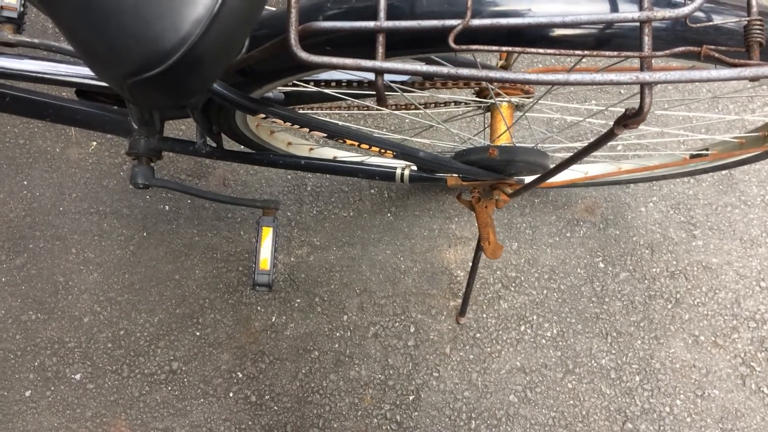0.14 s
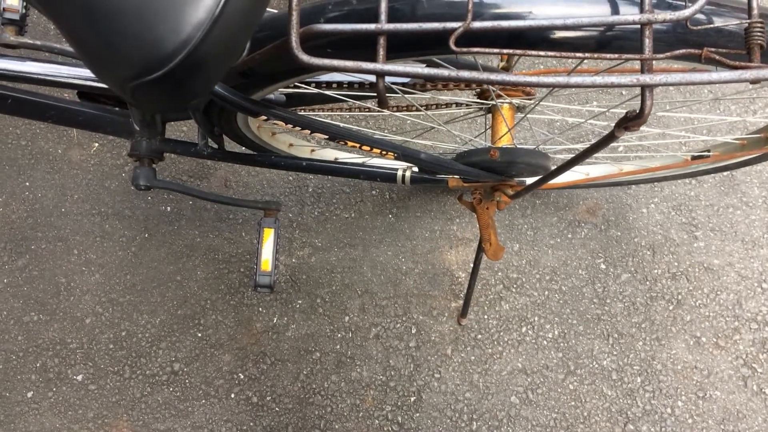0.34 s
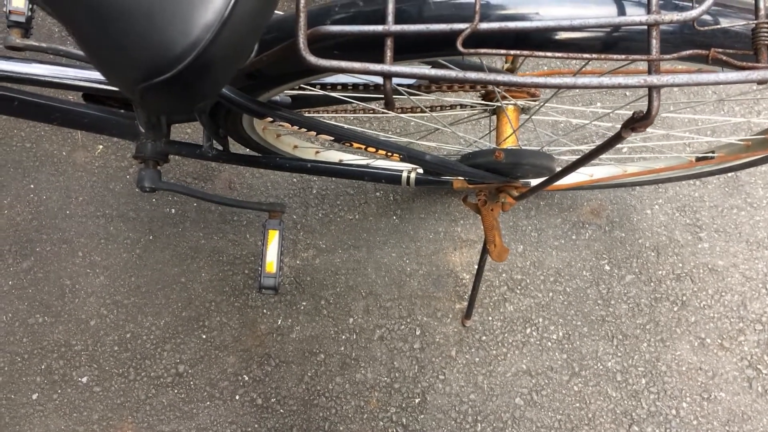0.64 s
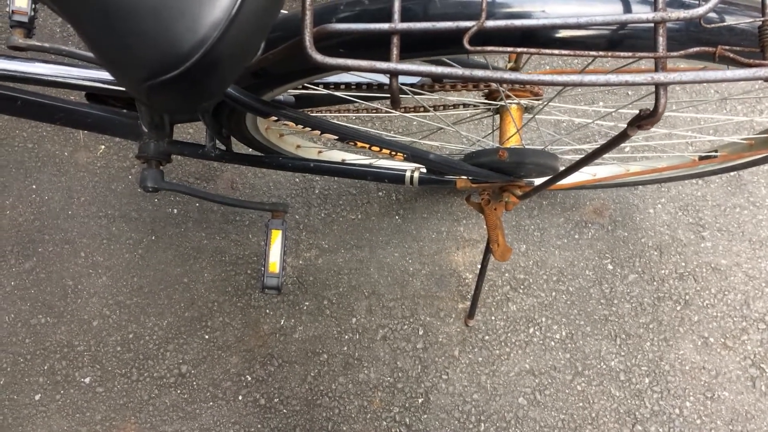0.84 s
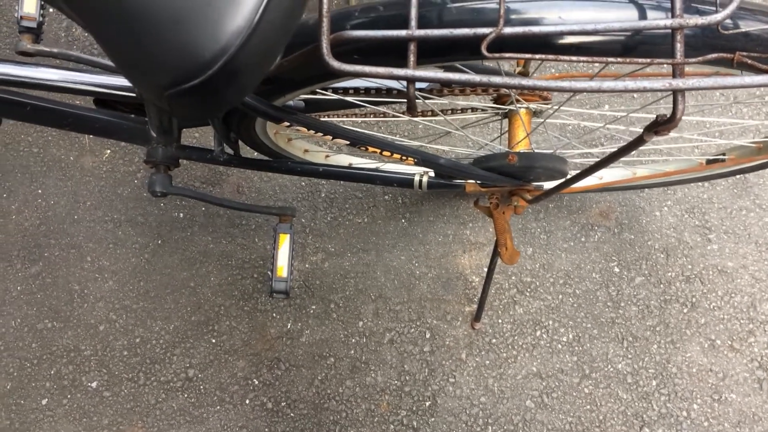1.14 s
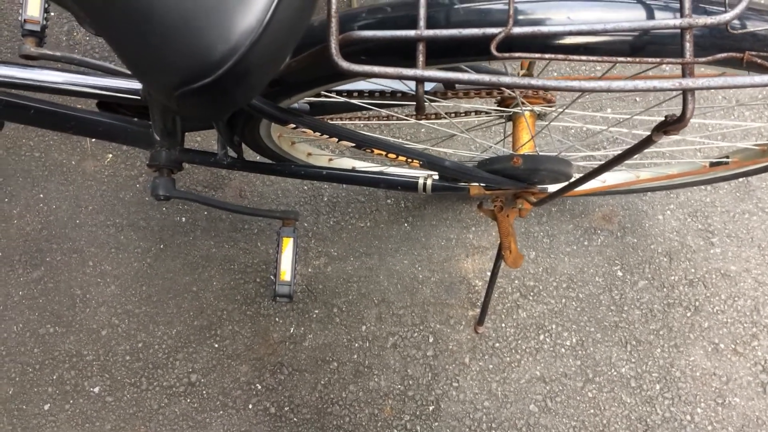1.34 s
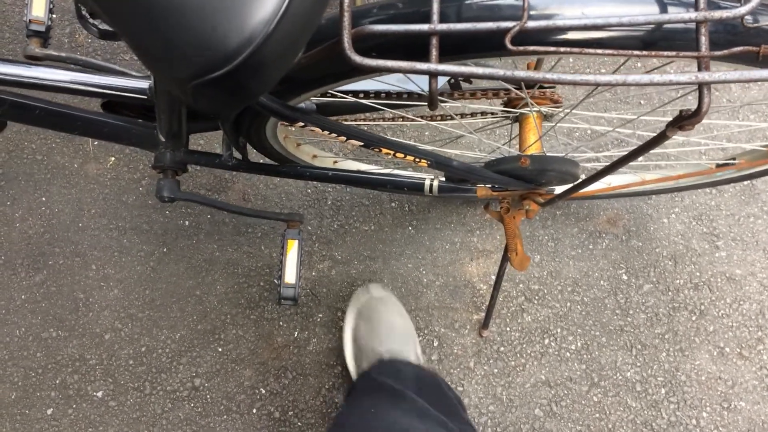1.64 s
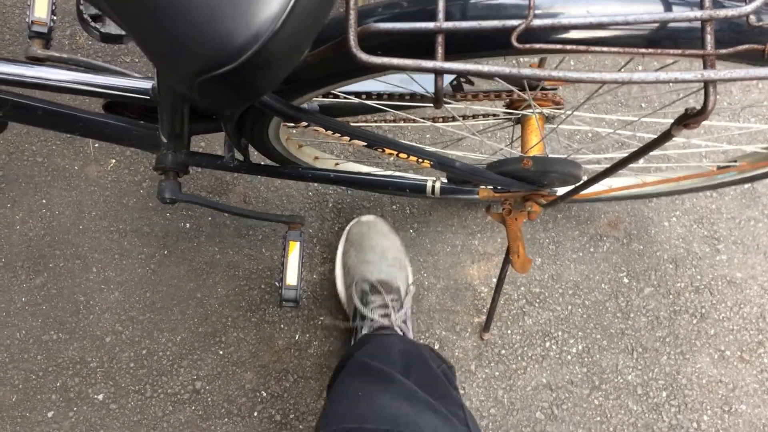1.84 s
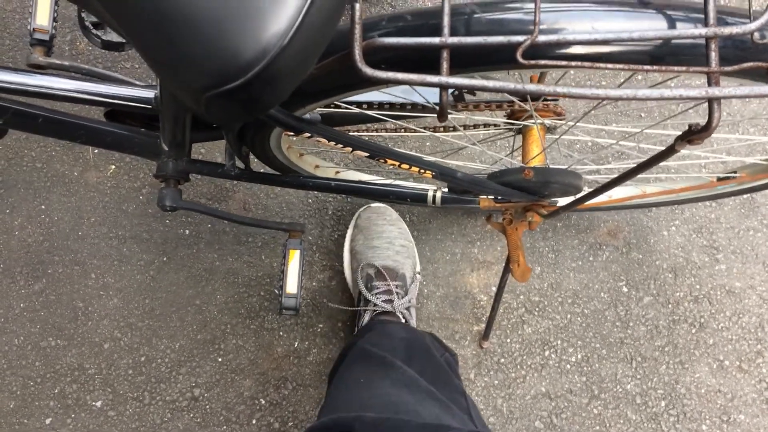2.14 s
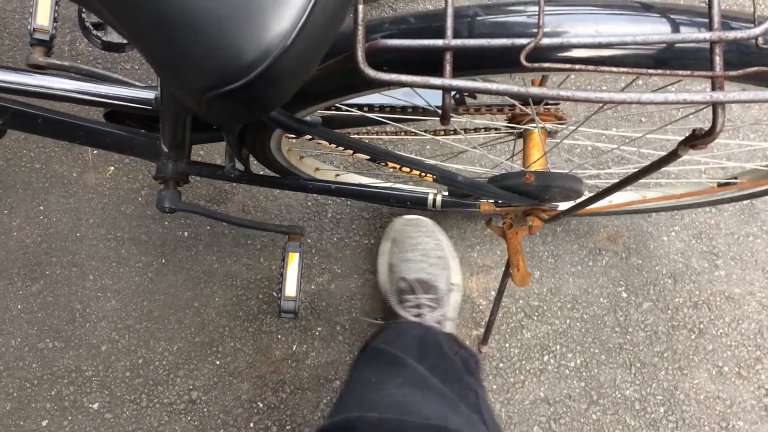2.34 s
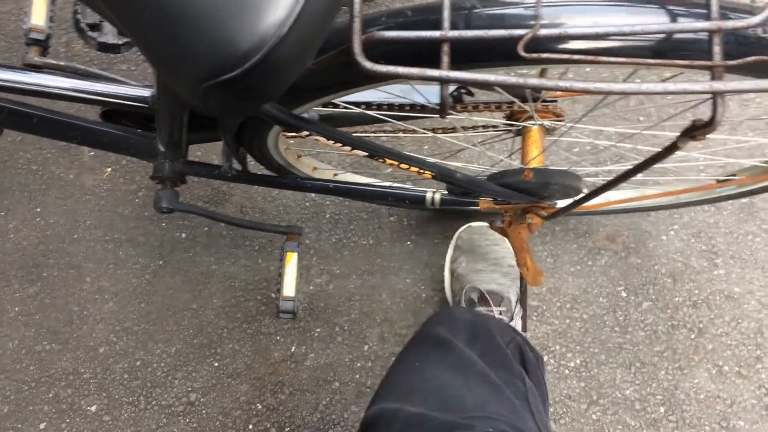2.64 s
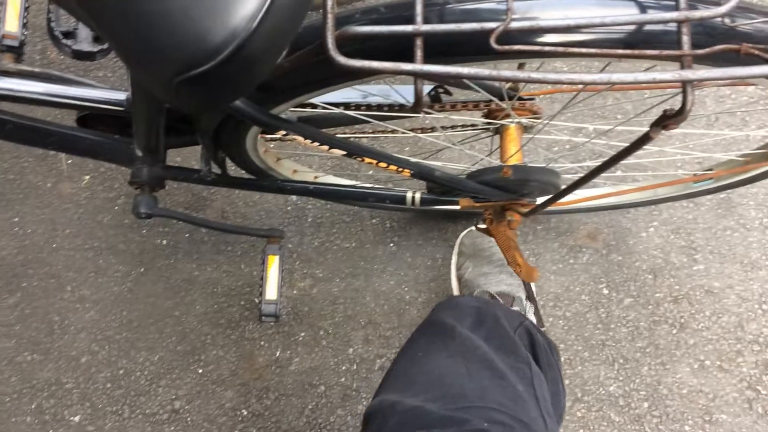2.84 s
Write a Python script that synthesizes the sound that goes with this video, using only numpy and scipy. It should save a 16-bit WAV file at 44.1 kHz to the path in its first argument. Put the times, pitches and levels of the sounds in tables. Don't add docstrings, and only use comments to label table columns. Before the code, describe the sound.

Small engine idles close by and draws away, then a shoe knocks a steel bicycle kickstand

```python
import sys
import numpy as np
from scipy import signal
from scipy.fft import rfft, irfft, next_fast_len
from scipy.io import wavfile
from scipy.ndimage import uniform_filter1d, map_coordinates

SR = 44100
rng = np.random.default_rng(int(sys.argv[2]) if len(sys.argv) > 2 else 0)


def dump(signal):
    limited = np.clip(np.atleast_2d(signal).T, -1, 1)
    pcm = np.round(limited * 32767).astype(np.int16)
    wavfile.write(sys.argv[1], SR, pcm)


def ratio(d):
    e = np.asarray(d, float) / 20
    return 10 ** e


N = 132741
TIME = np.arange(N) / SR


def unit(x):
    return x / np.sqrt(np.mean(x ** 2) + 1e-20)


def along(points, hz):
    f, v = np.transpose(points)
    return np.interp(np.log(hz + 1), np.log(f + 1), v)


def wobble(rate):
    knots = rng.standard_normal(int(N * 80 / SR) + 4)
    return map_coordinates(knots, [TIME * min(rate, 80)])


def filtered(x, response):
    m = next_fast_len(len(x) + 8192)
    return irfft(rfft(x, m) * response(np.fft.rfftfreq(m, 1 / SR)), m)[:len(x)]


def rush(spectrum, patchy_db):
    z = signal.stft(rng.standard_normal(N), nperseg=512)[2]
    field = uniform_filter1d(rng.standard_normal(z.shape), size=6, axis=0)
    field = uniform_filter1d(field, size=12, axis=1)
    x = signal.istft(z * ratio(patchy_db * unit(field)), nperseg=512)[1][:N]
    return unit(filtered(x, lambda hz: ratio(along(spectrum, hz))))


def struck(t, db, t60, rise_s):
    return ratio(db - 60 * t / t60) * (1 - np.exp(-t / rise_s))


def add_at(out, s, sound):
    out[round(s * SR):][:len(sound)] += sound


# (frequency [Hz], density [dB per Hz])
TRAFFIC_SPECTRUM = [(12, -41), (20, -16), (86, -7), (114, -6.5), (140, -8), (243, -11), (404, -11),
                    (560, -21), (700, -23.5), (910, -29), (1540, -120)]
# (frequency [Hz], density [dB per Hz])
HISS_SPECTRUM = [(290, -52), (500, -7.5), (860, -5), (1400, -7), (2060, -5.5), (2600, -12.5), (4500, -23),
                 (5850, -71), (9900, -120)]
# (frequency [Hz], density [dB per Hz])
AIR_SPECTRUM = [(2500, -5.5), (4200, -14), (5000, 0), (7000, -6), (10000, -10), (13500, -14), (15000, -17),
                (15700, -24)]


def street(near_db):
    rumble_db = -46.5 + 0.26 * near_db + 1.0 * wobble(4.5)
    hiss_db = -51 + 0.41 * near_db + 0.47 * wobble(5.9)
    air_db = -67.5 + 0.45 * near_db + 0.27 * wobble(3.65)
    rumble = ratio(rumble_db) * rush(TRAFFIC_SPECTRUM, patchy_db=1.5)
    hiss = ratio(hiss_db) * rush(HISS_SPECTRUM, patchy_db=1.0)
    return rumble + hiss + ratio(air_db) * rush(AIR_SPECTRUM, patchy_db=1.0)


# (time [s], low edge [Hz], high edge [Hz], level [dB])
FLECKS = [
    (.522, 8200, 10600, -74),
    (.638, 6200, 8500, -72),
    (1.172, 9600, 11200, -82),
    (1.242, 7500, 9100, -79),
    (1.381, 4100, 5800, -72),
    (1.73, 4150, 5170, -71),
    (2.288, 4600, 6370, -73),
    (2.287, 10190, 11770, -81),
    (2.31, 6900, 8480, -77),
    (2.984, 5123, 6400, -73),
]


def flecks():
    half_s = 0.01
    out = np.zeros(N)
    for s, low, high, db in FLECKS:
        band = unit(filtered(rng.standard_normal(N), lambda f: (f > low) & (f < high)))
        out += ratio(db) * np.exp(-((TIME - s) / half_s) ** 4) * band
    return out


# (time [s], level [dB], decay t60 [s])
TAPS = [
    (1.02, -56, .035),
    (1.028, -61, .03),
    (2.556, -60, .012),
    (2.5585, -47.5, .02),
    (2.565, -52, 0.033),
    (2.575, -62, .08),
    (2.729, -66, .036),
    (2.745, -64, 0.048),
]
# (frequency [Hz], level [dB])
TAP_SPECTRUM = [(900, -28), (2000, 16), (4600, 0), (6200, 1), (7200, 3), (8300, 3), (12800, -2.5),
                (15500, -6)]
# (start [s], end [s], level [dB])
SCUFFS = [
    (1.555, 1.981, -74.5),
    (2.7, 2.801, -75),
]
# (frequency [Hz], density [dB per Hz])
SCUFF_SPECTRUM = [(4000, -28), (7000, 5), (10000, 1), (13000, -8.5), (15000, -22)]


def shoe():
    push, t = np.zeros(N + SR), TIME[:4000]
    for s, db, t60 in TAPS:
        add_at(push, s, struck(t, db, t60, 0.00047) * rng.standard_normal(len(t)))
    taps = filtered(push[:N], lambda hz: ratio(along(TAP_SPECTRUM, hz)))
    stroke = np.zeros(N)
    for start, end, db in SCUFFS:
        ramp = np.minimum(TIME - start, end - TIME) / 0.028
        stroke += ratio(db) * np.clip(ramp, 0, 1)
    return taps + stroke * rush(SCUFF_SPECTRUM, patchy_db=-3.5)


# (frequency [Hz], level [dB], decay t60 [s])
ROD_MODES = [(1500, -52, .06), (2100, -52, .06), (3200, -58, .03), (3800, -59, .04), (5206, -65, .07),
             (6250, -62, .06), (8210, -66, .04), (9485, -69, .04), (12700, -68, .06), (13900, -72, .05)]
# (time [s], level [dB], extra level of the low modes [dB])
ROD_HITS = [
    (1.021, 2, -12),
    (2.556, -12, 13),
    (2.559, 1, -3),
    (2.566, -6, 4),
    (2.573, -8, 2),
]


def kickstand():
    out, t = np.zeros(N + SR), TIME[:5000]
    for s, db, low_db in ROD_HITS:
        for hz, mode_db, t60 in ROD_MODES:
            level_db = db + mode_db + low_db * (hz < 4000) + rng.normal(0, 1.5)
            add_at(out, s, struck(t, level_db, t60, 0.00092) * np.sin(2 * np.pi * hz * t))
    return out[:N]


# (time [s], length [s], level [dB])
SQUEAKS = [
    (.655, .026, -62),
    (.685, .045, -70),
    (.75, .03, -76),
    (.95, .04, -72),
    (1.46, .04, -77),
    (1.53, .03, -68),
]


def brake():
    squeak_hz, blur_rad, octave_db = 5700, 1.3, -9
    grip = sum(ratio(db) * np.exp(-((TIME - s - d / 2) / (0.41 * d)) ** 2) for s, d, db in SQUEAKS)
    phase = 2 * np.pi * squeak_hz * TIME + blur_rad * wobble(70)
    flutter = ratio(4.0 * wobble(75.0))
    octave = ratio(octave_db) * np.sqrt(grip / grip.max()) * np.sin(2 * phase)
    return grip * flutter * np.sqrt(2) * (np.sin(phase) + octave)


# (time [s], peak level [dB], frequency [Hz])
VALVE_TICKS = [(.004, -38, 3800), (.0472, -38, 4070), (.0688, -46, 3820), (.0908, -39, 3900),
               (.122, -40, 3970), (.149, -47, 3920), (.1657, -39, 3990), (.195, -43, 3780),
               (.2106, -39, 4000), (.2548, -38, 3900), (.2696, -46, 3740), (.29, -47, 3900),
               (.3, -43, 3700), (.3346, -49, 3520), (.345, -55, 3600), (.3731, -40, 3720),
               (.4035, -43, 3680), (.4319, -39, 3780), (.4614, -53, 3800), (.5656, -47, 3970),
               (.615, -48, 3680), (.659, -51, 3010), (.7123, -38, 3120), (.7572, -44, 3240),
               (.9068, -48, 3560), (.9512, -45, 3460)]


def valves(near_db):
    t60, upper_ratio, upper_db, snap_db = .0075, 1.13, -6, -11
    top_db, gain_db = -40, 4
    rattle_db, rattle_follows = -75.5, 1.68

    def bright(f):
        return (f / 3500) ** 4 / (1 + (f / 3500) ** 4) / (1 + (f / 8300) ** 10)

    def rattle_colour(f):
        return bright(f) * (1 + 1.7 / (1 + ((f - 3900) / 450) ** 2))

    ticks, t = np.zeros(N + SR), TIME[:1500]
    for s, db, hz in VALVE_TICKS:
        snap = ratio(snap_db) * unit(filtered(rng.standard_normal(len(t)), bright))
        upper = ratio(upper_db) * np.sin(2 * np.pi * hz * upper_ratio * t)
        modes = np.sin(2 * np.pi * hz * t) + upper
        add_at(ticks, s, struck(t, min(db, top_db) + gain_db, t60, .0005) * (modes + snap))
    clumps_db = 2.6 * unit(uniform_filter1d(rng.standard_normal(N), size=60))
    grains = rng.standard_normal(N) * ratio(clumps_db)
    rattle = ratio(rattle_db + rattle_follows * near_db) * unit(filtered(grains, rattle_colour))
    return ticks[:N] + rattle


# (time [s], firing rate [Hz], exhaust drone [dB], upper partner [dB], casing ring [dB])
ENGINE = [(0.0, 33.7, -41, -42, -61), (0.04, 33.93, -39.5, -47, -49.5), (0.43, 34.03, -39.5, -42.5, -51),
          (1.0, 33.47, -40, -48, -59.5), (1.15, 33.47, -38.5, -44.5, -62.5), (1.4, 33.81, -42.5, -57, -55),
          (1.42, 32.75, -42, -65.5, -56), (1.49, 32.59, -55, -42.5, -59.5),
          (1.68, 33.71, -41.5, -47, -61.5), (2.0, 34.06, -40, -43.5, -60), (2.08, 33.89, -45, -55, -66),
          (2.29, 33.37, -49.5, -50.5, -67), (2.51, 33.09, -40, -47, -62), (2.59, 33.66, -40.5, -68, -59.5),
          (2.7, 33.32, -41, -48, -84), (2.74, 33.74, -40.5, -62, -73), (2.89, 33.8, -43.5, -48, -68),
          (3.01, 34, -46, -44.5, -70)]


def controls():
    s, *cols = np.transpose(ENGINE)
    hz, drone_db, partner_db, ring_db = [np.interp(TIME, s, c) for c in cols]
    first_firing_s = .0143
    turns = np.cumsum(hz) / SR - first_firing_s * hz[0]
    return turns, drone_db, partner_db, ring_db


# (frequency [Hz], width [Hz], level [dB])
CASING_MODES = [(380, 84, -1), (1008, 62, 3.5), (1670, 240, -1), (2370, 650, -12), (2630, 530, -17),
                (3400, 780, -13.5), (6860, 2400, -39)]


def casing(turns, near_db):
    level_db, burst_s, lag_s, scatter_db, steady = -55.5, 0.0096, -0.005, 4.5, 0.87
    idle_hz = ENGINE[0][1]
    cycle = turns - lag_s * idle_hz
    since = (cycle % 1) / idle_hz / burst_s
    size = ratio(scatter_db * rng.uniform(-1, 1, 200))[np.floor(cycle).astype(int) + 2]
    burst = (steady + size * since * np.exp(1 - since)) * rng.standard_normal(N)

    def body(f):
        total = 0
        for k, (hz, width, db) in enumerate(CASING_MODES):
            mode = 1j * f * width / (hz * hz - f * f + 1j * f * width)
            total = total + (-1) ** k * ratio(db) * mode
        return total / (1 + (f / 8000) ** 4) / (1 + (250 / (f + 1)) ** 4)

    return ratio(near_db + level_db) * unit(filtered(burst, body))


# (frequency [Hz], width [Hz], level [dB])
PANELS = [(2350, 12, -11), (2440, 36, -9), (2670, 66, -13)]


def ring(turns, ring_db):
    ring_hz, spread_hz, width_hz, gain_db = 2100, 25, 55, 1.5
    sag_hz, sag_s = 40, .8
    ping_s, scatter_db, hum_mix = .0038, 1, .8
    ping_fade_s = 1.1

    def narrow(hz, width):
        return unit(filtered(rng.standard_normal(N), lambda f: 1 / (1 + ((f - hz) / width) ** 2)))

    firing = np.round(turns).astype(int)
    size, detune, start = rng.standard_normal((200, 3))[firing + 1].T
    since = (turns - firing) / ENGINE[0][1]
    drop = 1 - np.exp(-TIME / sag_s)
    hz = ring_hz - sag_hz * drop + spread_hz * detune
    pulse = ratio(scatter_db * size) * np.exp(-.5 * (since / ping_s) ** 2)
    ping = pulse * np.sin(2 * np.pi * (hz * since + start))
    near_hum = np.sqrt(1 - drop) * narrow(ring_hz, width_hz)
    hum = near_hum + np.sqrt(drop) * narrow(ring_hz - sag_hz, width_hz)
    panels = sum(ratio(db) * narrow(centre, width) for centre, width, db in PANELS)
    main = unit(np.exp(-TIME / ping_fade_s) * unit(ping) + hum_mix * hum)
    swell = ratio(-57) * np.exp(-((TIME - 2.17) / .09) ** 2) * hum
    return ratio(ring_db + gain_db) * (main + panels) + swell


# (multiple of the firing rate, level re drone [dB])
WEAK_ORDERS = [(2, -11.5), (3, -29.5), (6, -11.5), (8, -22.5), (11, -26.5), (12, -18), (13, -19.5)]
# (time [s], level [dB])
BARK = [(0, 6), (.28, 5.5), (.4, -4.5), (.95, 4.5), (1.14, -7), (1.5, -13), (1.66, 6), (1.85, -15),
        (2.08, 4), (2.2, 2), (2.35, 6.5), (3, -5.5)]


def exhaust(turns, drone_db, partner_db):
    pipe_order, pipe_sharp = 5.2, .4
    follows, wander_db, blur_rad = .6, 3, .28
    bark_from = 9

    def tone(k, blur):
        turn = np.arctan((k - pipe_order) / pipe_sharp) - np.arctan((4 - pipe_order) / pipe_sharp)
        return np.sqrt(2) * np.cos(2 * np.pi * k * turns + turn + blur * wobble(6.885))

    base_db = drone_db.mean() + follows * (drone_db - drone_db.mean())
    bark_db = np.interp(TIME, *np.transpose(BARK))
    weak = np.zeros(N)
    for k, db in WEAK_ORDERS:
        level_db = base_db + db + bark_db * (k > bark_from) + wander_db * wobble(6.29)
        weak += ratio(level_db) * tone(round(k), blur_rad * k / 2)
    drone = ratio(drone_db) * tone(4, 0.024)
    partner = ratio(partner_db + 2.2 * wobble(11)) * tone(5, 0.41)
    return drone + partner + weak


def scene():
    turns, drone_db, partner_db, ring_db = controls()
    near_db = 8.5 * np.exp(-TIME / 0.91)
    surroundings = street(near_db) + shoe() + kickstand() + brake()
    engine = valves(near_db) + casing(turns, near_db) + ring(turns, ring_db)
    engine = engine + exhaust(turns, drone_db, partner_db)
    mono = surroundings + engine
    return np.array([mono, mono])


def roll_off(x):
    return signal.sosfilt(signal.butter(12, 15710, fs=SR, output="sos"), x)


def record(dry):
    side = flecks()
    return roll_off(dry + np.array([side, -side]))


dry = scene()
out = record(dry)
dump(out)
```